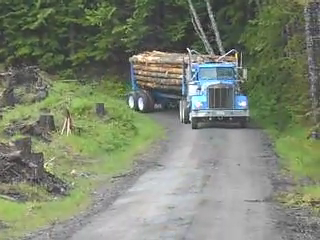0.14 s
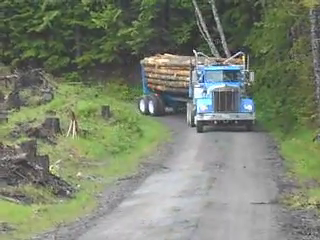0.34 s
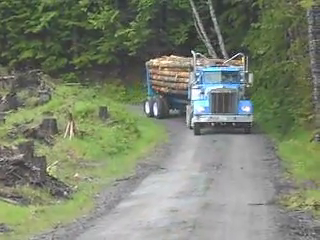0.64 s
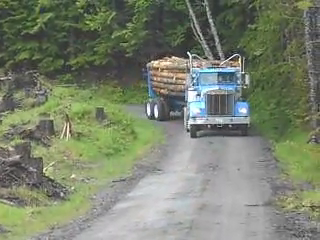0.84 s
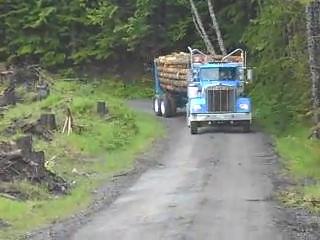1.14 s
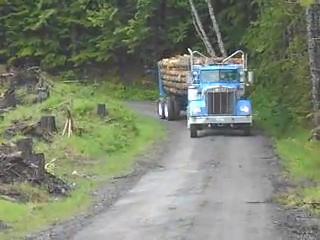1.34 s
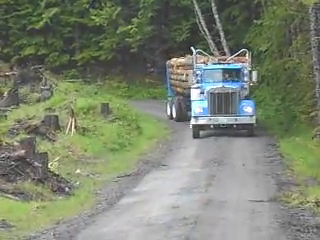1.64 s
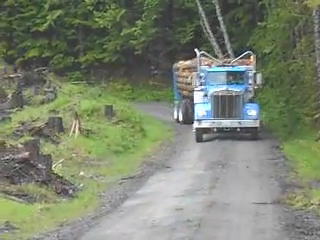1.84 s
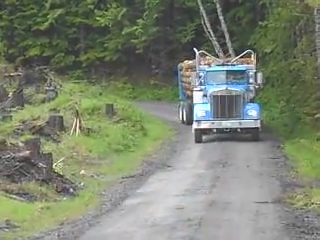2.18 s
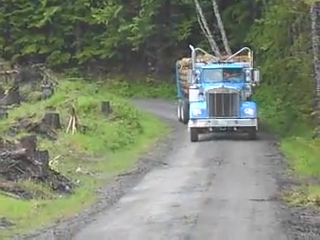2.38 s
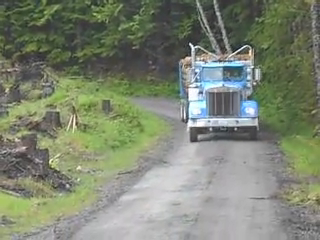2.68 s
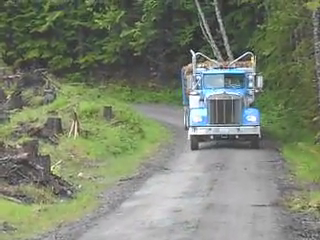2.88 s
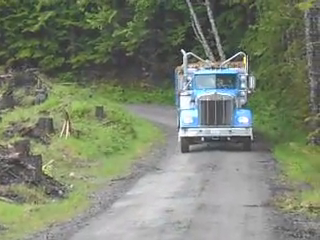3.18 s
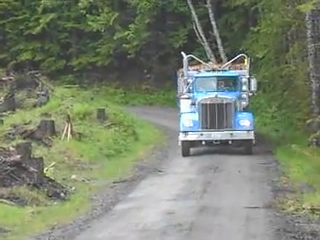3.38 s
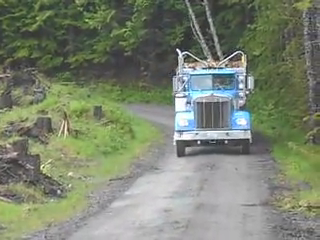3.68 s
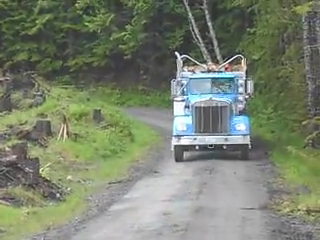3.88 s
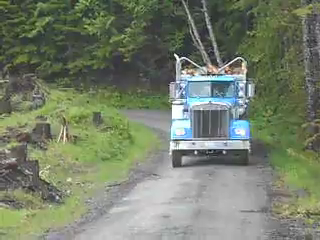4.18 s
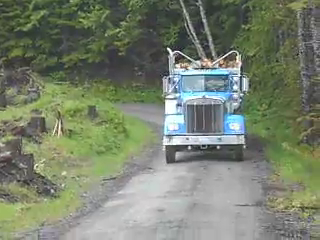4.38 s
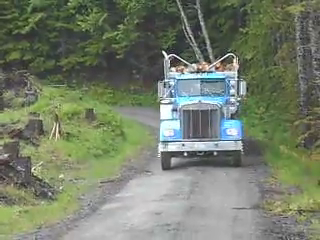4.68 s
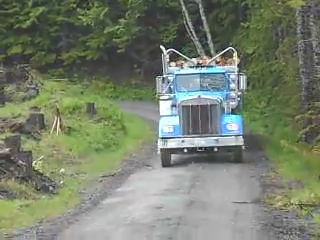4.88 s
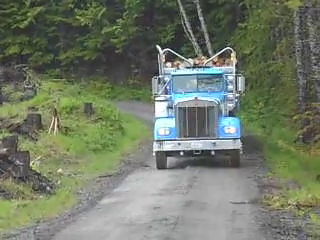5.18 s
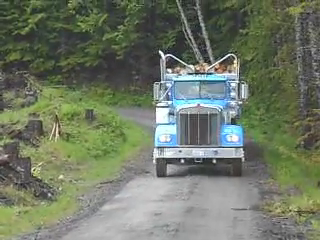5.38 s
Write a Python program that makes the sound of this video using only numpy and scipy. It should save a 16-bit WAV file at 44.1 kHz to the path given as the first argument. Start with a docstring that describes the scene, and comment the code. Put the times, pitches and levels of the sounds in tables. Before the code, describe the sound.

A loaded diesel log truck creeps down a gravel forest road on its engine brake. The exhaust pulses rapidly and unevenly throughout, a deep thumping with a bark on top, over light valve clatter and faint tyre hiss. The bark softens briefly midway, then returns closer and drier as the engine slows a little. The microphone is ahead of the truck, with a short echo from the trees.

```python
"""A loaded log truck creeps down a gravel forest road, held back by its engine brake. From the start,
six cylinders dump compressed air unevenly into the exhaust: each release thumps the pipe and barks
from the stack, while valves clatter, tyres hiss and the trees scatter the engine's sound.
From 2 s the truck rounds a bend, and its midrange dips as the cab swings to face us.
By 4.2 s it is near and head-on, the engine turning a little slower, the bark drier."""
import sys
import numpy as np
from scipy import signal
from scipy.fft import rfft, irfft
from scipy.io import wavfile
from scipy.ndimage import uniform_filter1d

SR = 44100
rng = np.random.default_rng(int(sys.argv[2]) if len(sys.argv) > 2 else 0)


def put_to_file(sound):
    """Save the sound as 16-bit audio at rate SR, in the file named by the first command-line argument."""
    columns = np.atleast_2d(sound).T  # one column per channel
    safe = np.clip(columns, -1, 1)
    whole_steps = np.round(safe * 32767)
    wavfile.write(sys.argv[1], SR, whole_steps.astype(np.int16))


N = 243873
TIME = np.arange(N) / SR


def undb(db):
    """Decibels to gain."""
    return 10 ** (np.asarray(db) / 20)


def unit(x):
    """Scale to rms 1."""
    return x / np.sqrt(np.mean(x ** 2))


def curve(table):
    """An automation line through (seconds, value) points."""
    return np.interp(TIME, *np.transpose(table))


def hold_level(x, window_s=0.3045):
    """Ride the slow loudness to rms 1, keeping the pulses."""
    return x / np.sqrt(uniform_filter1d(x ** 2, int(window_s * SR)) + 1e-18)


def later(x, delay_s):
    """The same sound, arriving by a longer path."""
    return np.interp(TIME - delay_s, TIME, x, left=0)


def colour(x, points, size=8192):
    """Minimum-phase EQ through (Hz, dB) points, so a pulse rings after it strikes."""
    hz, db = np.transpose(points)
    bins = np.maximum(np.arange(size // 2 + 1), 1) * SR / size
    gain = undb(np.interp(np.log(bins), np.log(hz), db))
    cepstrum = irfft(np.log(gain))
    cepstrum[1:size // 2] *= 2
    cepstrum[size // 2 + 1:] = 0
    return signal.fftconvolve(x, irfft(np.exp(rfft(cepstrum))))[:N]


def scatter(x, t60, patterns=6, build_up_s=.012):
    """Dense late reflections, crossfading from pattern to pattern as the truck moves."""
    t = TIME[:SR // 2]
    wet = 0
    for k in range(patterns):
        tail = rng.standard_normal(len(t)) * np.minimum(t / build_up_s, 1) * undb(-60 * t / t60)
        offset = np.clip(TIME / TIME[-1] * (patterns - 1) - k, -1, 1)
        wet = wet + np.cos(np.pi / 2 * offset) * unit(signal.fftconvolve(x, tail)[:N])
    return wet


def strikes(cycles, places, db, jitter_s, spread_db):
    """One pulse per cycle at each place (share of a cycle), a little uneven in time and size."""
    starts = np.arange(-1, cycles[-1] + 1)[:, None]
    chance = rng.standard_normal((len(starts), len(places), 2))
    at = np.interp(starts + places, cycles, np.arange(N), left=-N, right=2 * N)
    at += jitter_s * SR * chance[..., 0]
    size = undb(db + spread_db * chance[..., 1])
    inside = (at >= 0) & (at < N - 1)
    return np.bincount(at[inside].astype(int), size[inside], N)


# The path round the bend. Each row: time in seconds, nearness from 0 to 1.
BEND = [(2.0, 0.2), (4.2, 1)]
def nearness():
    """The truck turns from far and side-on (0) to near and head-on (1)."""
    return curve(BEND)


def approach(far, near, eq):
    """Crossfade a source from its far tone to its near tone."""
    rows, share = np.array(eq), nearness()
    far_tone = unit(colour(far, rows[:, [0, 1]]))
    near_tone = unit(colour(near, rows[:, [0, 2]]))
    return unit((1 - share) * far_tone + share * near_tone)


# The brake's limping rhythm. Each entry: a cylinder's release time in sixths of a cycle.
RELEASE_TIMES = [-.33, .59, 1.67, 2.59, 3.68, 4.31]
# Cylinder accents in firing order. Each row: far thump, near thump, far bark, near bark, in relative dB.
ACCENTS = [(1, 7, 0, 2), (-17.5, -38.5, -19.5, -23), (-6, 1, 0, 1.5), (-3.5, 0, 0.5, -18),
           (-1.5, 5, -5, 1.5), (-16.5, -37.5, -1.5, -24.5)]
FAR_THUMP, NEAR_THUMP, FAR_BARK, NEAR_BARK = range(4)
def releases(cycles, accent, jitter_s, spread_db):
    """Each of the six cylinders dumps its compressed air once a cycle."""
    return strikes(cycles, np.array(RELEASE_TIMES) / 6, np.array(ACCENTS)[:, accent], jitter_s, spread_db)


# The pipe's boom. Each row: frequency in Hz, far and near gain in relative dB.
PIPE_EQ = [(19.7, -47.5, -46), (49.5, -43, -19.5), (78.6, -15, -11), (116.2, -4, 0), (143.3, -3, 3.5),
           (184, 1, -1.5), (214.5, -4, -2), (267, -6.5, -4), (293.2, -14.5, -13.5), (314.6, -5, -4.5),
           (346.4, -33, -38), (390, -16.5, -20), (440, -36, -45.5), (1500, -67, -77.5)]
# The pressure wave returning along the exhaust. Each row: delay in seconds, gain in dB.
PIPE_ECHOES = [(0.0179, -9.5), (0.04, -17.5)]
def pipe_thump(cycles):
    """Each release rings the pipe's low modes; the brake's steady load keeps the level even."""
    far = releases(cycles, FAR_THUMP, jitter_s=.00007, spread_db=1)
    near = releases(cycles, NEAR_THUMP, jitter_s=.00007, spread_db=1)
    pipe = approach(far, near, PIPE_EQ)
    echoes = sum(undb(db) * later(pipe, delay) for delay, db in PIPE_ECHOES)
    trees = undb(-17) * scatter(pipe, t60=.45)
    throb = undb(-24) * np.sin(2 * np.pi * 3 * cycles)  # every second cylinder pushes harder
    return hold_level(pipe + echoes + trees) + throb


# The stack's midrange bite. Each row: frequency in Hz, far and near gain in relative dB.
STACK_EQ = [(142, -47, -52), (410, -19, -5.5), (585, -9, -24.5), (609, -7.5, -8), (710, -0.5, -4),
            (871, -4, 3.5), (946, -8, -5.5), (1040, -4, -5), (1183, -19, -8.5), (1580, -22, -23),
            (2390, -28.5, -26.5), (3200, -47.5, -51.5), (4940, -87, -70)]
def stack_bark(cycles, puff_s=.005):
    """Each release's steep front cracks in the stack, a turbulent puff follows, and trees smear both."""
    far = unit(releases(cycles, FAR_BARK, jitter_s=.00005, spread_db=.46))
    near = unit(releases(cycles, NEAR_BARK, jitter_s=.00005, spread_db=.46))
    crack = approach(far, near, STACK_EQ)
    puff_envelope = signal.lfilter([1], [1, -np.exp(-1 / (puff_s * SR))], far + near)
    gas = puff_envelope * rng.standard_normal(N)
    puff = approach(gas, gas, STACK_EQ)
    trees = scatter(crack + undb(3.5) * puff, t60=.65, patterns=9)
    trees_db = np.interp(nearness(), [0, .5, 1], [2, -1.5, -2.5])  # drier as it nears
    bark = crack + undb(-7.5) * puff + undb(trees_db) * trees
    road_bounce = undb(-6.5) * later(bark, .0012)  # rounds each crack
    return hold_level(bark + road_bounce)


# The valve gear's rattle. Each row: frequency in Hz, far and near gain in relative dB.
VALVE_EQ = [(101, -41.5, -41.5), (396, -12.5, -11), (670, -1.5, 2.5), (1063, 0.5, -1.5), (1273, -6, -8.5),
            (1510, -5.5, -0.5), (1854, -8.5, -4.5), (2040, -9.5, -8.5), (2242, -2, -3), (2395, -6, -12.5),
            (2865, -22, -21), (3640, -28, -27.5), (4900, -43.5, -41)]
def valve_clatter(cycles, count=16):
    """Releases knock the block; rockers and injectors tick in a repeating order over the fan's rush."""
    places = (np.arange(count) + rng.random(count)) / count
    tick_db = 2 * rng.standard_normal(count)
    ticks = unit(strikes(cycles, places, tick_db, jitter_s=.00004, spread_db=2.5))
    knocks = unit(releases(cycles, FAR_THUMP, jitter_s=.00022, spread_db=2))
    side_on = 1 - nearness()  # head-on, the bonnet hides the block
    direct = undb(-3.5) * ticks + undb(-4.5) * side_on * knocks
    trees = scatter(ticks, t60=.31)
    fan = undb(2) * rng.standard_normal(N)
    engine = direct + trees + fan
    return hold_level(approach(engine, engine, VALVE_EQ))


# The gravel's tone. Each row: frequency in Hz, gain in relative dB.
GRAVEL_EQ = [(100, 1), (1500, 4), (3100, -17), (4000, -15.5), (4450, -6), (5000, -15.5), (6300, -10),
             (7200, -3.5), (7900, 2), (8700, -2), (10200, 3), (10800, -6.5), (11400, -20), (12200, -32)]
# The tyres' fader ride. Each row: time in seconds, level in dB before the mix gain.
TYRE_FADER = [(0.1, -60.5), (2.13, -59), (2.26, -63.5), (2.93, -64.5), (3.17, -58.5), (3.65, -60.5),
              (3.94, -57.5), (4.63, -60), (4.88, -55.5), (5.27, -58), (5.45, -57.5)]
def tyre_hiss(grains_per_s=2500):
    """Tyres press countless small stones: tiny ticks within a smooth distant hiss."""
    size = undb(2 * rng.exponential(size=N))
    stones = (rng.random(N) < grains_per_s / SR) * rng.standard_normal(N) * size
    gravel = rng.standard_normal(N) + undb(-7.5) * unit(stones)
    return undb(curve(TYRE_FADER)) * unit(colour(gravel, GRAVEL_EQ))


def cab_swing(centre_s=2.85, width_s=.75):
    """The cab swings to face us: a smooth bump, peaking at 1, that ducks the midrange."""
    return np.exp(-((TIME - centre_s) / width_s) ** 2)


# The engine's sagging revs. Each row: time in seconds, speed in revolutions per minute.
ENGINE_RPM = [(0.0, 1547.7), (0.4, 1560.2), (0.65, 1520.3), (1.0, 1548.4), (1.6, 1549.2), (1.9, 1520.7),
              (2.2, 1537.6), (2.5, 1515.9), (2.8, 1489.5), (3.0, 1499.8), (3.5, 1460.6), (3.85, 1442.2),
              (4.25, 1400.9), (5.0, 1397.5), (5.25, 1432.9), (5.53, 1435.1)]
def scene():
    """One crankshaft times every engine sound; the mix follows the bend and the revs."""
    rpm = curve(ENGINE_RPM)
    cycles = -.424 + np.cumsum(rpm / 120) / SR  # two revolutions per four-stroke cycle
    bark_db = -35 + 1.5 * nearness() - 2 * cab_swing()
    rattle_db = .0417 * (rpm - 1500)  # a faster engine rattles harder
    clatter_db = -42 + 6 * nearness() - 4 * cab_swing() + rattle_db
    exhaust = undb(-22.5) * pipe_thump(cycles) + undb(bark_db) * stack_bark(cycles)
    truck = exhaust + undb(clatter_db) * valve_clatter(cycles) + undb(3) * tyre_hiss()
    return truck[None]


def record(dry):
    """A small camera's microphone: a deep notch in the treble and a steep cut above."""
    notch = signal.butter(2, [5050, 6200], "bandstop", fs=SR, output="sos")
    high_cut = signal.ellip(8, .2, 70, 12000, fs=SR, output="sos")
    return signal.sosfilt(high_cut, signal.sosfilt(notch, dry))


dry = scene()
out = record(dry)
put_to_file(out)
```